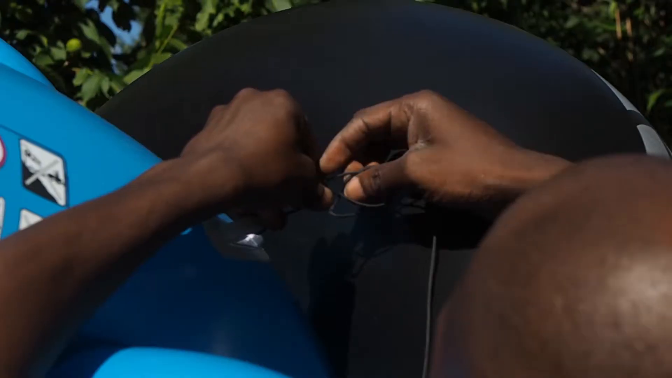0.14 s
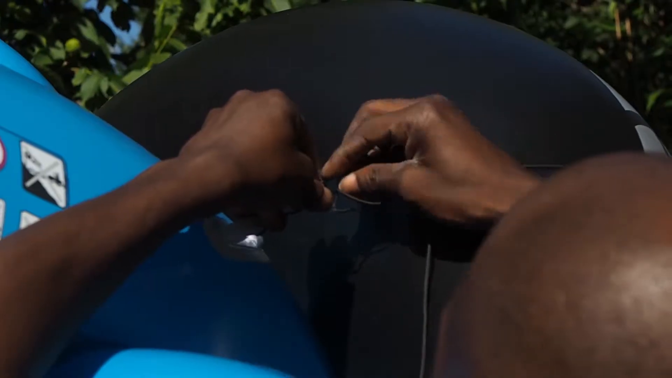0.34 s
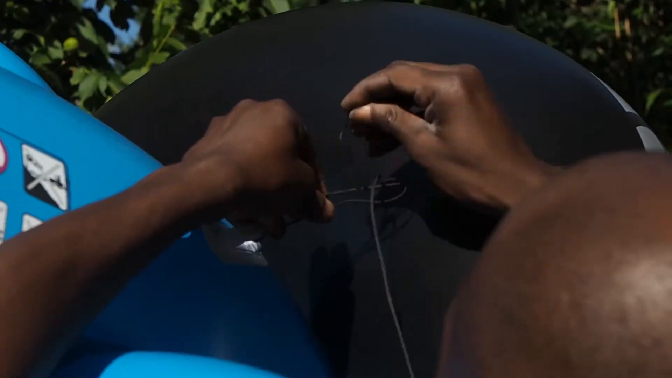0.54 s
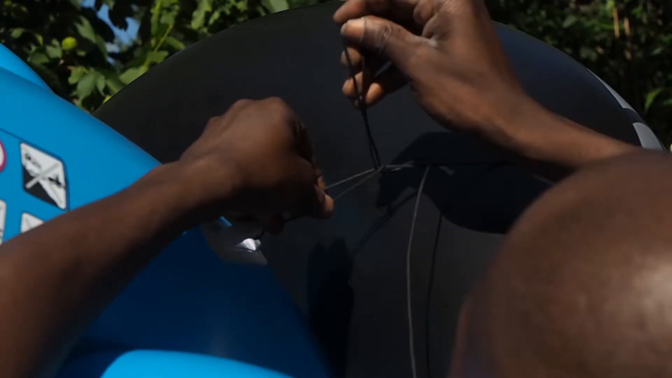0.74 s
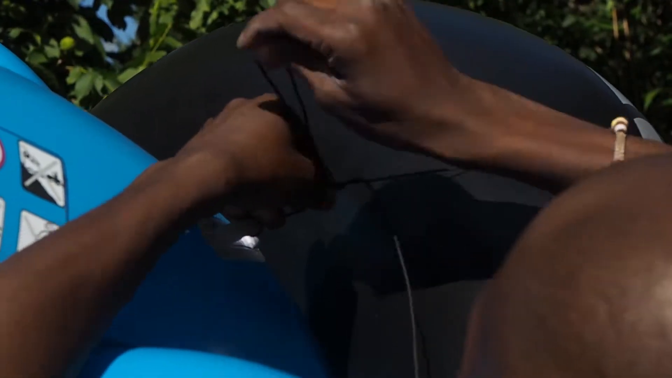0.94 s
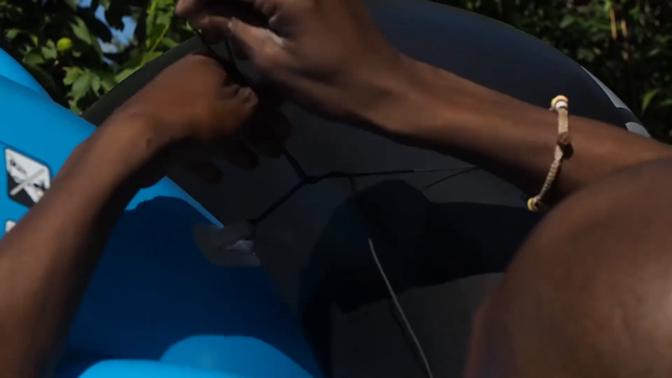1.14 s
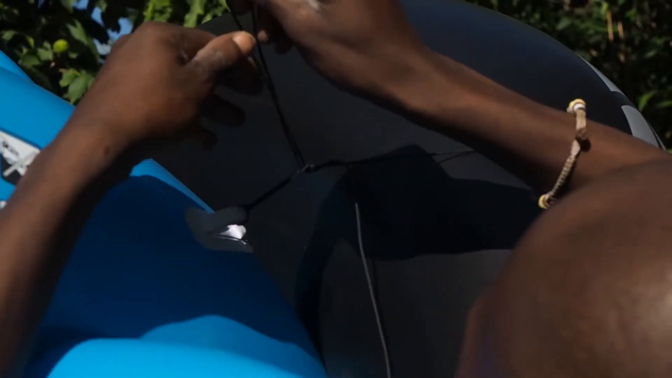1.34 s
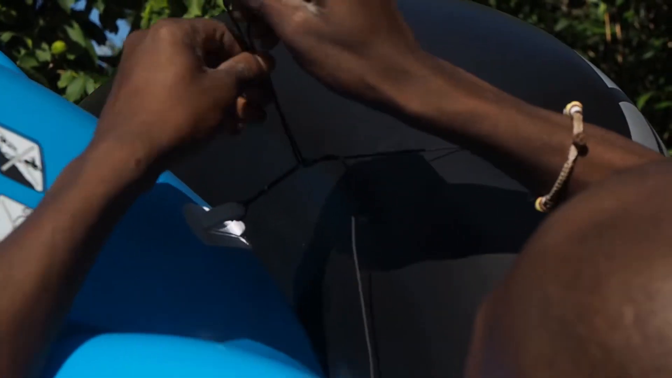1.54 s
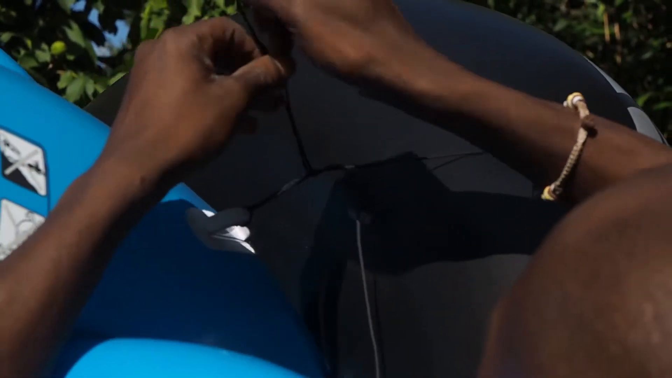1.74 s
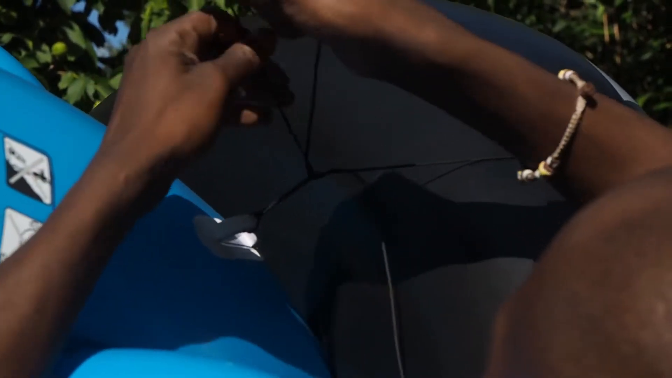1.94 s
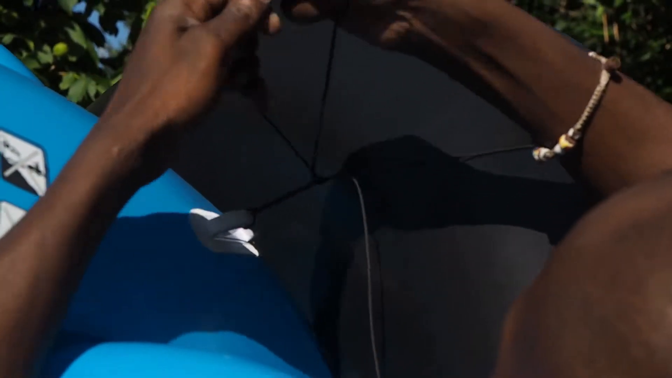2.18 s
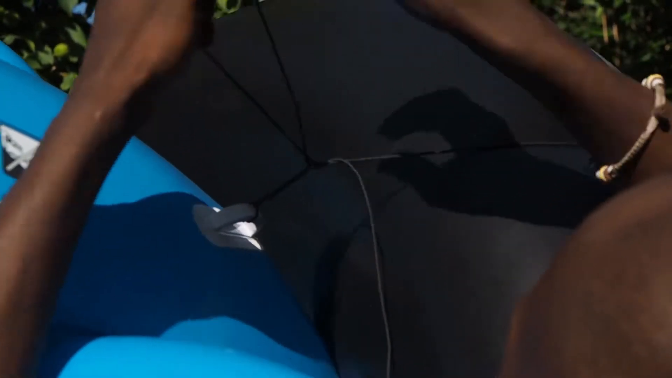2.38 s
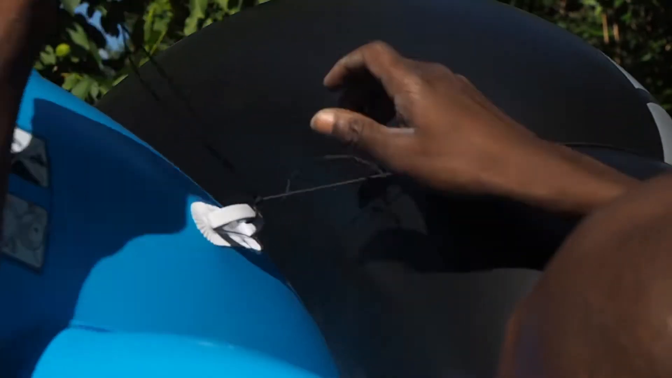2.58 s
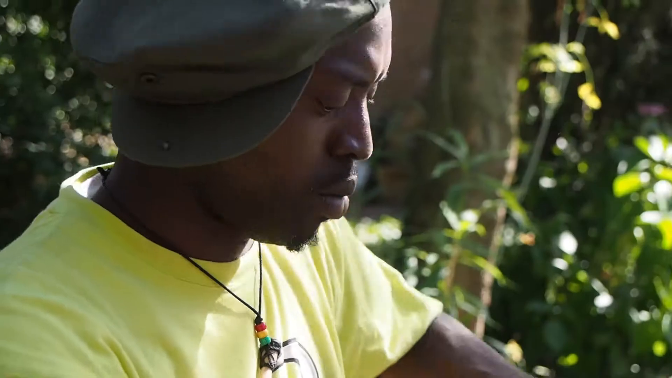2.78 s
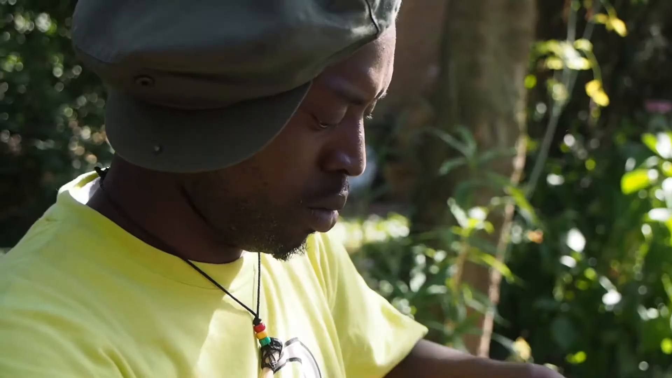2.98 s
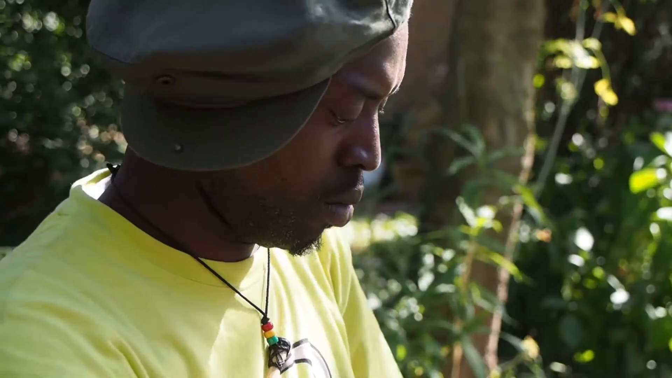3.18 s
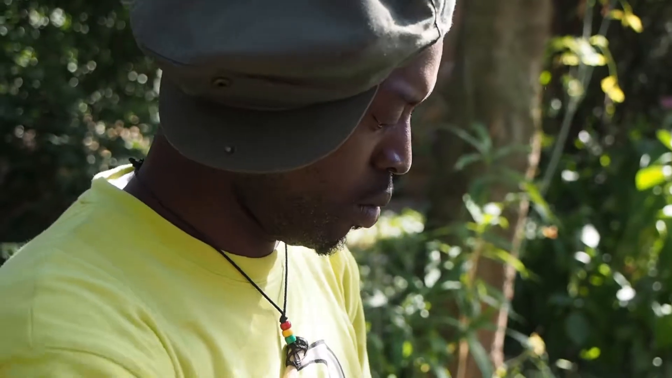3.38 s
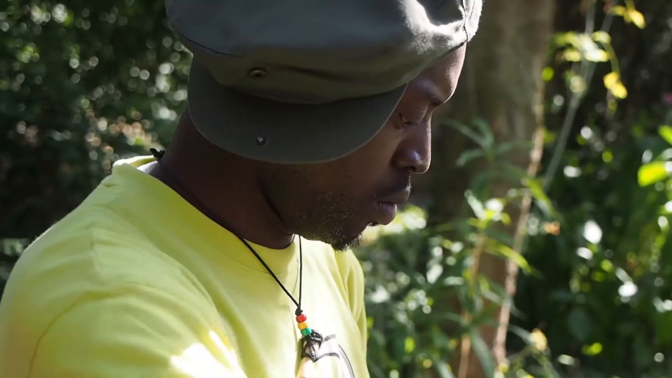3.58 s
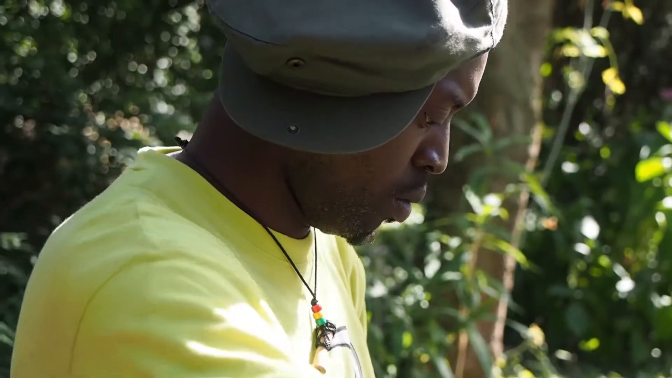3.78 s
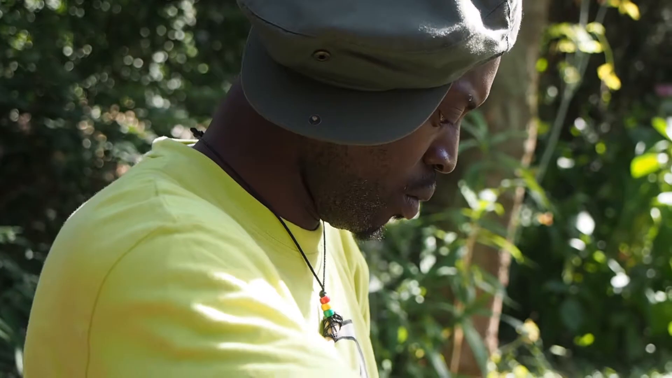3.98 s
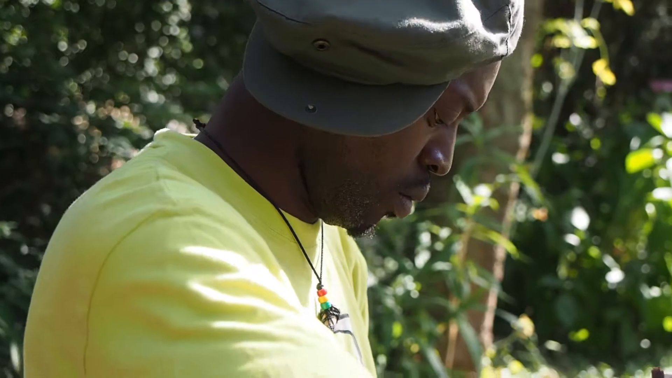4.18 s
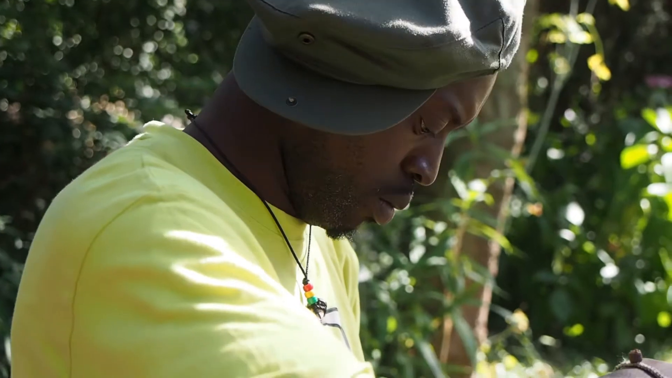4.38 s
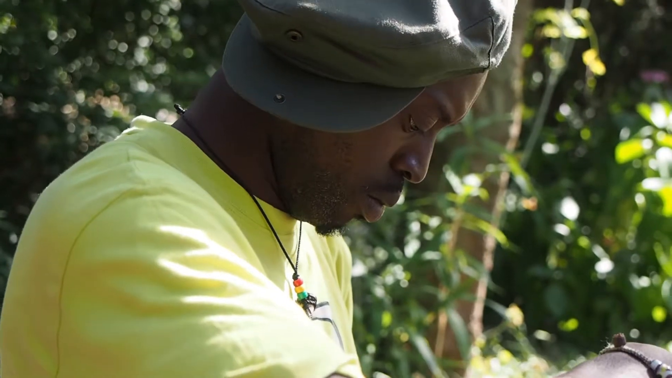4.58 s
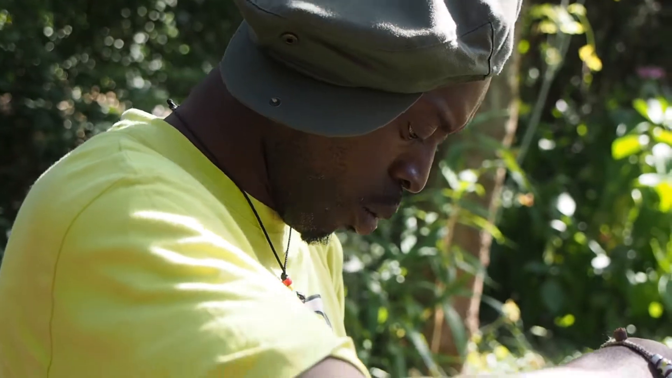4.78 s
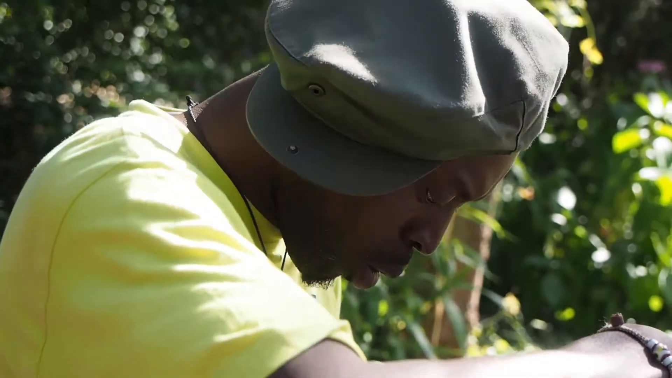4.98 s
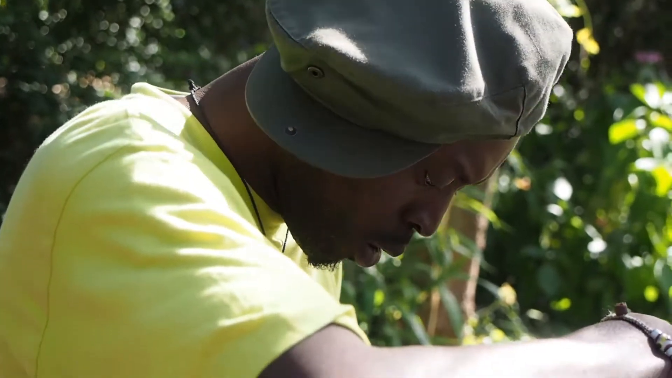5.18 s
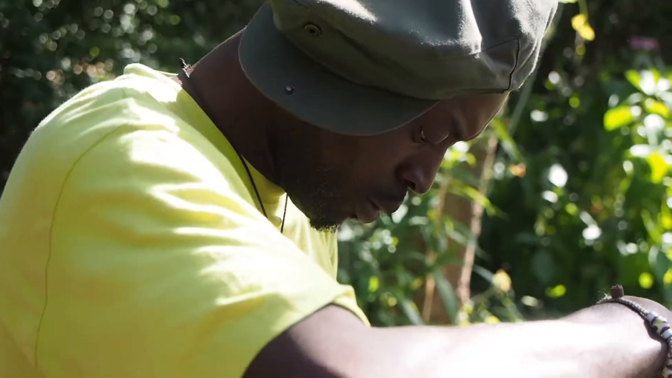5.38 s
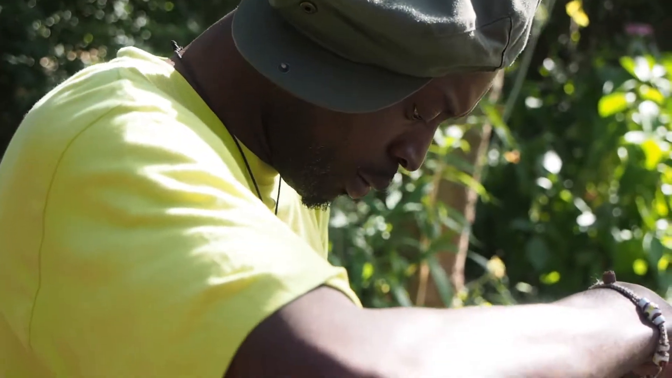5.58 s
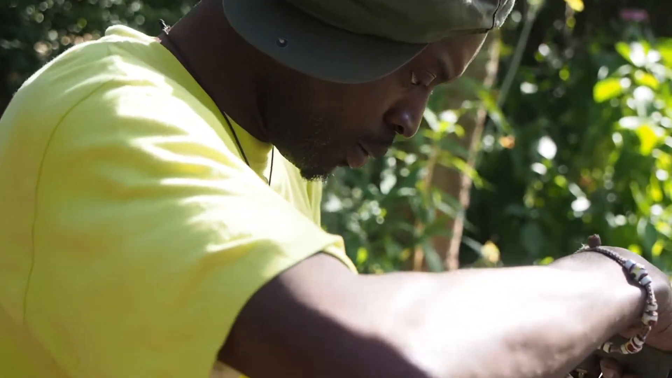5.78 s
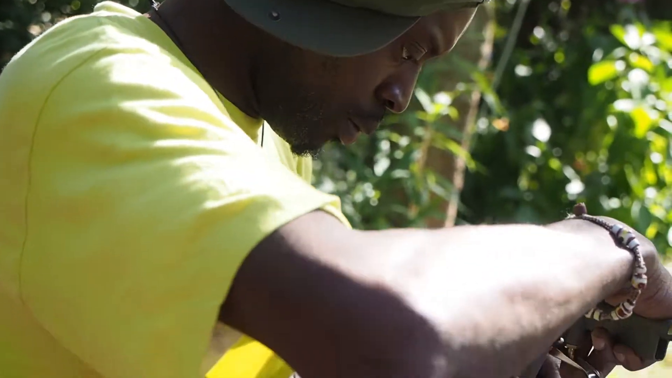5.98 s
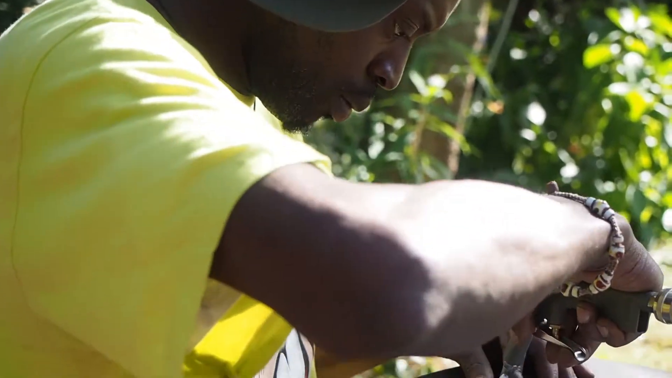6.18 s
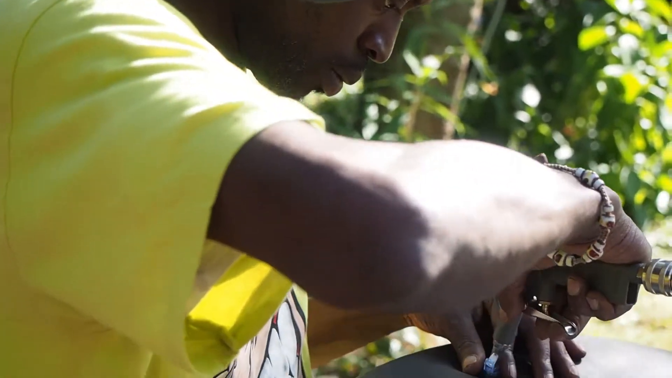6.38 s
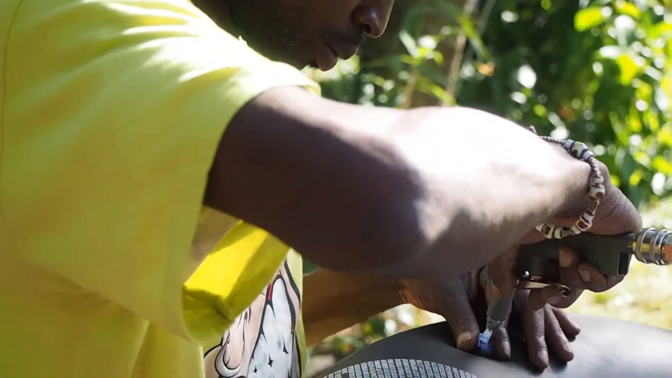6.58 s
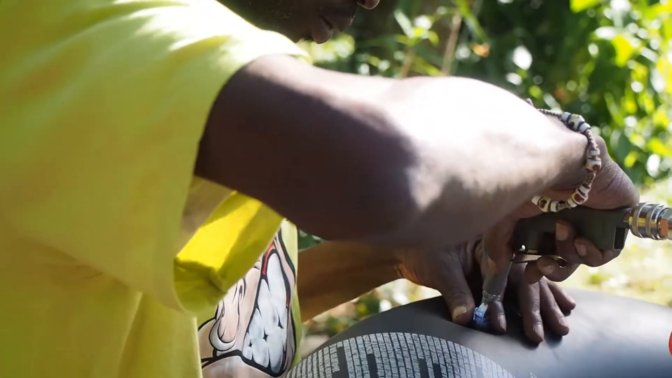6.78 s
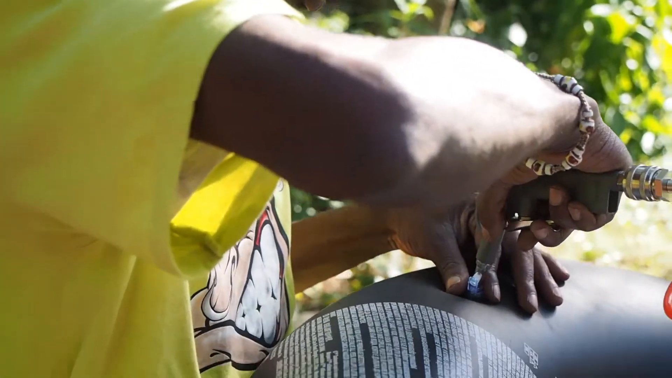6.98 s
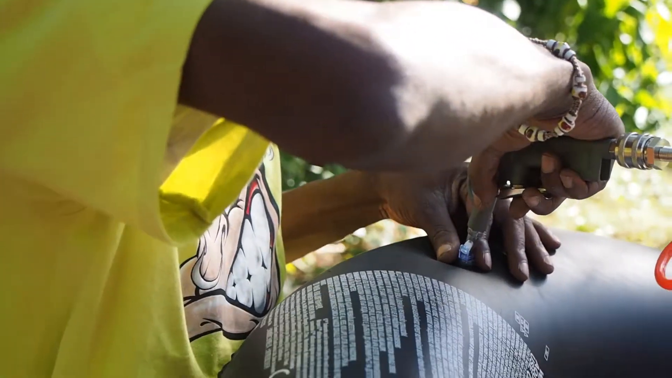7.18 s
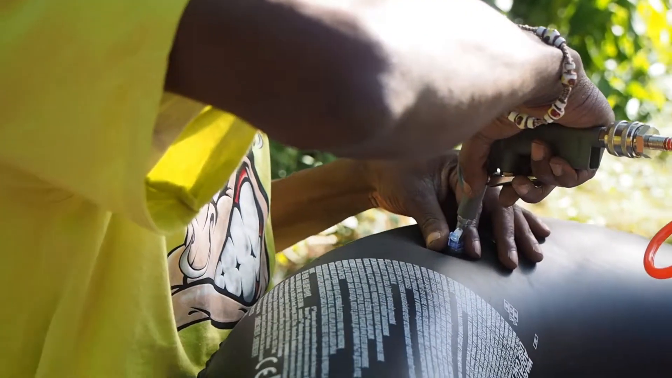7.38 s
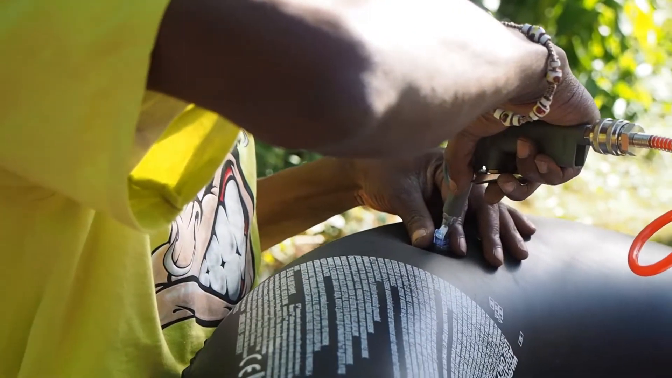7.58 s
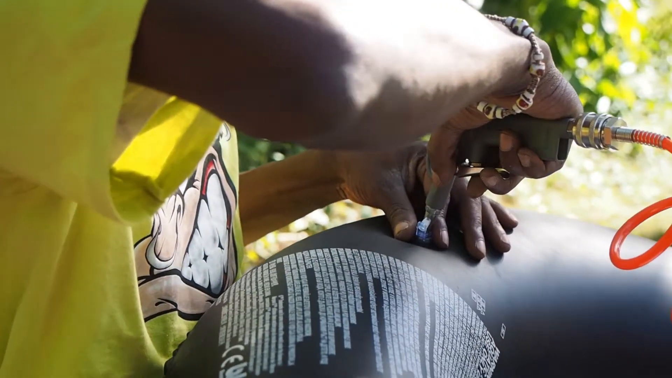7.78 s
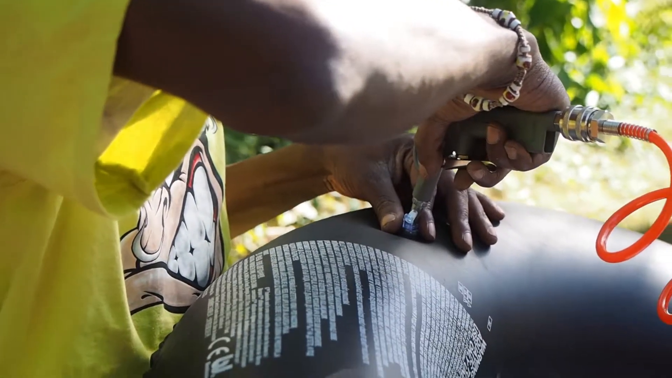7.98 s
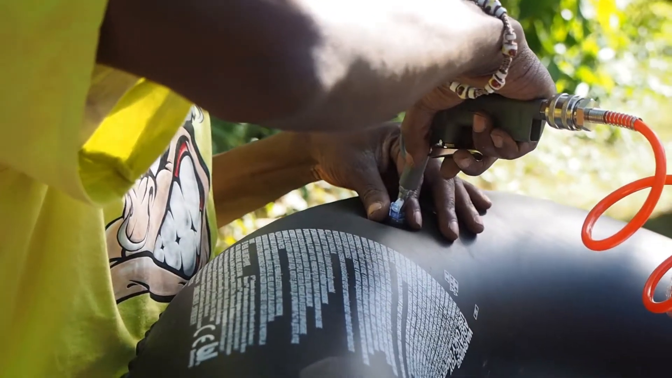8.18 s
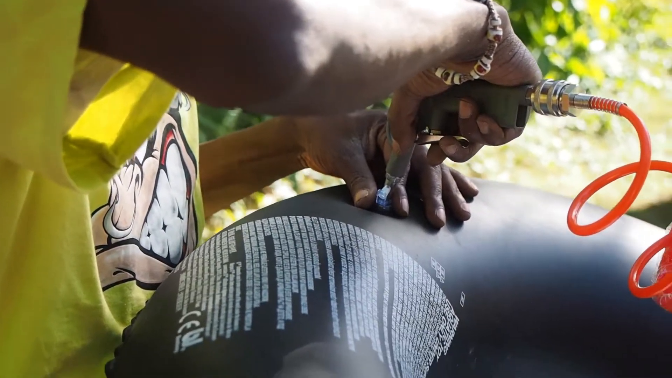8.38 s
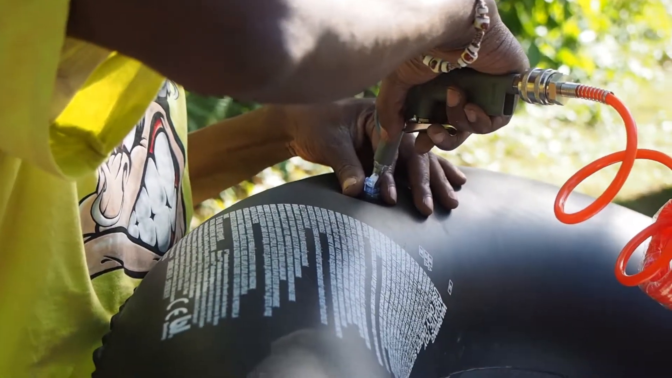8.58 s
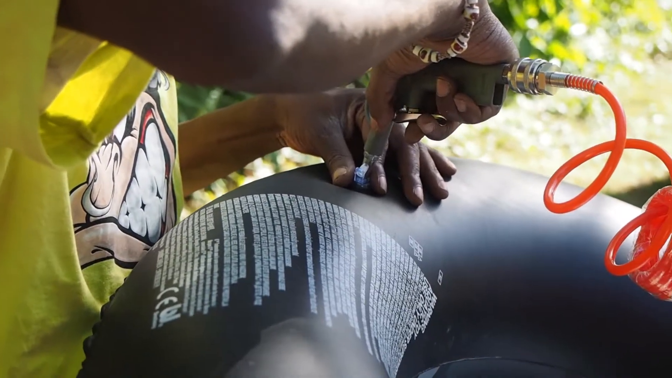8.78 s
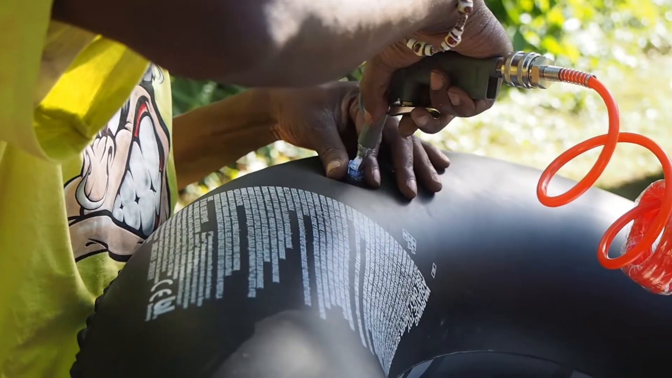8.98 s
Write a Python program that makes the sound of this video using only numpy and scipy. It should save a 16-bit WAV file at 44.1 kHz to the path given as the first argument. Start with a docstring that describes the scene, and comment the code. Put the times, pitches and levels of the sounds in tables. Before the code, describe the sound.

From the start, a piston air compressor runs outdoors close to the microphone: a steady buzzing hum, rapid metallic valve clatter and a rush of intake air. Between 0.5 and 2.6 seconds, hands make several short knocks on a taut rubber inner tube, the strongest near 1.8 seconds. At about 2.9 seconds a darker, boomier, more reflective sound of the compressor cuts in, while the closer one fades over four seconds. Faint bands of hiss swell and sink around 3.5 to 4.6 seconds, and a barely audible low drone enters near 4.5 seconds. At 6.5 seconds an air gun opens on the tube's valve with a sharp spit, then holds a loud, bright, turbulent hiss as the compressor drops well back. From 7.2 seconds two faint, high, fluttering whistles grow inside the jet, which continues until the end at about 9 seconds.

```python
"""A piston air compressor runs outdoors, close by: its strokes hum, its valve clatters, its intake and fan
rush, and hands bump a rubber tube. At 2.85 s a second, boomier listening place cuts in while the first fades
away; faint bands of hiss swell and sink, and a distant low drone sets in. At 6.5 s an air gun opens on the
tube's valve: a loud turbulent jet hisses and all the other sounds drop back. From 7.2 s two fluttering whistles
grow in the jet."""
import sys
import numpy as np
from scipy import signal
from scipy.fft import irfft
from scipy.io import wavfile
from scipy.ndimage import uniform_filter1d

SR = 44100
rng = np.random.default_rng(int(sys.argv[2]) if len(sys.argv) > 2 else 0)


def output_pcm(signal):
    """Save a mono or channel-first signal as 16-bit PCM at the path in sys.argv[1].

    Samples are clipped to [-1, 1] before scaling.
    """
    pcm = np.clip(np.atleast_2d(signal).T, -1, 1) * 32767
    wavfile.write(sys.argv[1], SR, np.round(pcm).astype(np.int16))


N = 398223

TURNS_PER_S = 46.8
CUT_S, DUCK_S = 2.853, 6.47  # the second place cuts in; the other sounds drop back once the jet opens

# the casing's EQ on the air noise: centre_hz, width_hz, boost_db
CASING_EQ = [(1570, 520, 6), (2650, 130, 2.5), (1920, 100, 3.5), (4440, 290, 2), (5500, 360, 2.5),
             (7070, 1600, -5.5), (7320, 270, -12), (11600, 460, -22), (13500, 480, -1)]

def compressor(gains, lag, harmonics, air, hum_delay_turns, spread, jitter_s, wet, puff_db):
    """Piston hum, valve clatter with its reflections, and air noise that can puff with the stroke."""
    turns = TURNS_PER_S * np.arange(N) / SR - uniform_filter1d(automation(lag), 20000, mode="nearest")
    clatter = valve_clatter(turns, jitter_s)
    clatter = evened(clatter + wet * reflections(clatter, t60_s=.22))
    puffs = gain_of(puff_db * np.cos(2 * np.pi * (turns - .35)))
    rush = puffs * noise(air, CASING_EQ, patchy_db=.5, flicker_db=-.06)
    rush = evened(rush + .3 * reflections(rush, t60_s=.05))
    hum = piston_hum(turns, harmonics, hum_delay_turns, spread)
    hum_gain, valve_gain, air_gain = gains
    return hum_gain * hum + valve_gain * clatter + air_gain * rush


def piston_hum(turns, harmonics, delay_turns, spread):
    """One pressure pulse a turn, its overtones spread over the stroke; strokes vary a little in force."""
    multiple, level_db = np.transpose(harmonics)
    spectrum = np.zeros(1025, complex)
    spectrum[multiple.astype(int)] = gain_of(level_db) * np.exp(-1j * np.pi * spread * multiple ** 2)
    stroke = evened(irfft(spectrum))
    waver_db = .2 * np.interp(turns, np.arange(-1, 430), rng.standard_normal(431))
    position = (turns - delay_turns) % 1 * 2048
    return gain_of(waver_db) * np.interp(position, np.arange(2049), np.r_[stroke, stroke[0]])


# reed and linkage hits within one turn: start_turns, level_db, tilt_db_per_khz, reed_db
VALVE_SLAPS = [(0, -1.5, -.7, 0), (.066, -4, 2, -8), (.1, -9, -1.5, -14), (.14, -14, 0, -12),
               (.21, -14, 0, -11), (.285, -10, 1, -12), (.325, -13, 1, -15), (.36, -9, -1, -12),
               (.405, -11, 1, -16), (.445, -14, 0, -16), (.485, -10, -1, -14), (.61, -15, 0, -17),
               (.69, -17, 0, -18), (.81, -19, 0, -18)]
# the cylinder head's metallic ring: pitch_hz, width_hz, level_db
HEAD_MODES = [(7000, 400, -12), (7750, 330, -2), (8050, 330, -2), (8500, 350, -3), (8900, 330, -1),
              (9250, 300, 0.1), (9650, 350, -3), (10050, 330, -1), (10450, 350, -3), (10850, 350, -5),
              (11300, 400, -10), (7770, 70, -20), (8050, 70, -20), (8950, 70, -19), (9210, 70, -18),
              (9360, 70, -19), (10060, 70, -19)]

def valve_clatter(turns, jitter_s):
    """Each slap rings the reed and its own spot on the head, a touch early or late, harder or softer."""
    out, taps = np.zeros(N), np.arange(-8, 9)
    scatter = rng.standard_normal((len(VALVE_SLAPS), 424, 2))  # timing and force, turn by turn
    spots = rng.random((len(VALVE_SLAPS), len(HEAD_MODES)))
    reed = ring(hz=13700, width_hz=540, level_db=-6.5)
    for (start_turns, level_db, tilt, reed_db), draws, spot in zip(VALVE_SLAPS, scatter, spots):
        at = np.interp(np.arange(-1, 423) + start_turns, turns, np.arange(N), -50, -50)
        at += jitter_s * SR * draws[:, 0]
        index = np.round(at).astype(int)[:, None] + taps
        clicks = np.sinc(index - at[:, None]) * np.hanning(19)[1:-1] * gain_of(draws[:, 1:])
        inside = (index >= 0) & (index < N)
        strikes = np.bincount(index[inside], clicks[inside], N)
        head = sum(ring(hz, width_hz, mode_db + level_db + tilt * (hz / 1000 - 9), phase)
                   for (hz, width_hz, mode_db), phase in zip(HEAD_MODES, spot))
        out += signal.oaconvolve(strikes, head + gain_of(reed_db) * reed)[:N]
    return evened(out)


def ring(hz, width_hz, level_db, phase_turns=0):
    """A struck mode; the reed lands over a fraction of a millisecond."""
    t = np.arange(1200) / SR
    attack = 1 - np.exp(-(t / .0002) ** 2)
    decay = np.exp(-np.pi * width_hz * t)
    return gain_of(level_db) * attack * decay * np.sin(2 * np.pi * (hz * t + phase_turns))


# how late the valve slaps as the motor speed drifts: time_s, lag_turns
NEAR_DRIFT = [(0, .613), (2.86, .632), (4.2, .634), (5, .63), (6.5, .603)]
# tone of the piston hum: turn_rate_multiple, level_db
NEAR_HARMONICS = [(1, -24.5), (2, -13), (3, -21), (4, -3.5), (5, -16.5), (6, -9), (7, -7.5), (8, -3.5),
                  (9, -2.5), (10, -17), (11, -3.5), (12, 3), (13, -3), (14, -1), (15, -8), (16, 3.5),
                  (17, -20), (18, -5.5), (19, -4), (20, -1), (21, -4), (22, -12), (23, -7.5), (24, -4),
                  (25, -22), (26, -33), (27, -20.5), (28, -17), (29, -9), (30, -21.5), (31, -11), (32, -5),
                  (33, -12), (34, -8), (35, -6), (36, -7), (37, -8), (38, -5), (39, -19), (40, -14),
                  (41, -9.5), (42, -12), (43, -13), (44, -18), (45, -20), (46, -22), (47, -33), (48, -26),
                  (49, -31), (50, -12), (51, -23), (52, -10), (53, -6), (54, -19), (55, -9), (56, -5.5),
                  (57, -11), (58, -31), (59, -26), (60, -21), (61, -15), (62, -8), (63, -19)]
# colour of the intake and cooling fan: frequency_hz, level_db
NEAR_AIR_COLOUR = [(24, -40), (40, -38), (85, -14), (136, -16), (183, -10.5), (462, -7), (564, -4),
                   (1220, -7), (2590, -6.5), (3400, -10), (6350, -7.5), (9010, 0), (12200, -16.5),
                   (13800, -19), (15600, -29)]
# slow waver of the overall level: time_s, gain_db
NEAR_WAVER = [(0, 0.6), (1.2, 0.76), (2, .3), (2.86, -1.7)]

def near_compressor(silent_s=7.03):
    """Close and fairly dry; after the cut each layer fades out at its own pace."""
    fade = np.clip(1 - since(CUT_S) / (silent_s - CUT_S), 0, 1)
    gains = [gain_of(level_db + automation(NEAR_WAVER)) * fade ** steepness
             for level_db, steepness in [(-27.5, 2), (-21.5, .81), (-26.5, 1.03)]]  # hum, valve, air
    return compressor(gains, NEAR_DRIFT, NEAR_HARMONICS, NEAR_AIR_COLOUR,
                      hum_delay_turns=.7, spread=-.125, jitter_s=.000013, wet=.22, puff_db=1.5)


# the motor's drift at the second place: time_s, lag_turns
FAR_DRIFT = [(0, .15), (2.86, .15), (4.4, .13), (5.2, .14), (6, .178), (7, .255), (8, .29), (9.1, .308)]
# the darker piston hum there: turn_rate_multiple, level_db
FAR_HARMONICS = [(1, -35), (2, -18), (3, -26), (4, -12), (5, -21.5), (6, -29), (7, -19), (8, -12.5),
                 (9, -7.5), (10, -6.5), (11, -12), (12, 3), (13, -1), (14, -7), (15, -1), (16, -5.5),
                 (17, -17.5), (18, -34), (19, -14.5), (20, -22), (21, -14), (22, -20.5), (23, -11.5),
                 (24, -15), (25, -36), (26, -22), (27, -30), (28, -17.5), (29, -31), (30, -21), (31, -31),
                 (32, -29), (33, -19.5), (34, -26), (35, -36), (36, -38.5), (37, -42), (38, -31), (39, -27),
                 (40, -17), (41, -18.5), (42, -28), (43, -13.5), (44, -13.5)]
# colour of the intake and fan there: frequency_hz, level_db
FAR_AIR_COLOUR = [(24, -44), (40, -44), (85, -33.5), (136, -23), (183, -15), (280, -24), (510, -5.5),
                  (564, -7), (706, -5.5), (841, -12.5), (1900, -13), (2020, -8), (2150, -12.5),
                  (5200, -19.5), (9010, -3.5), (15600, -28)]

def far_compressor(sag_db_per_s=-.07):
    """Boomier and wetter; it cuts in, sags a little and its level drops once the jet opens."""
    sag_db = sag_db_per_s * np.minimum(since(CUT_S), DUCK_S - CUT_S)
    gains = [fade_in(CUT_S, rise_s=.006) * gain_of(level_db + sag_db) * duck(depth_db)
             for level_db, depth_db in [(-22, -11.5), (-29.5, -10), (-27, -14)]]  # hum, valve, air
    return compressor(gains, FAR_DRIFT, FAR_HARMONICS, FAR_AIR_COLOUR,
                      hum_delay_turns=.011, spread=.1, jitter_s=.00003, wet=1., puff_db=0.)


# colour of the jet's bright hiss: frequency_hz, level_db
JET_COLOUR = [(180, -71), (300, -34), (411, -42), (518, -41), (544, -23), (721, -22), (836, -31.5),
              (1590, -15), (1820, -18.5), (3190, -11), (6830, -9), (8610, 2), (10500, -10), (13200, -14),
              (15600, -16.5)]
# resonant peaks and notches in the hiss: centre_hz, width_hz, boost_db
JET_EQ = [(2800, 83, -3.5), (3120, 540, 3), (3400, 130, -2), (3590, 200, 2.5), (3700, 100, -1.5),
          (4070, 110, -3), (4920, 150, 3), (5580, 170, 3.5), (5960, 81, 8.5), (6500, 150, 5),
          (7400, 490, 3.5), (8300, 320, 0), (9400, 89, 0.5), (13200, 1200, 7)]
# brief dips in the jet's level: centre_s, width_s, gain_db
JET_LEVEL_DIPS = [(6.97, 0.17, -1.5), (8.14, 0.16, -1.5), (8.5, 0.064, -1.1), (9.03, 0.27, -.9)]

def air_jet(open_s=6.465, level_db=-12.6, spit_s=.035, sway_hz=.2534, wet=.33):
    """Turbulent air escapes at the valve; reflections off tube and arms comb it, shifting as hands move."""
    t, age = np.arange(N) / SR, since(open_s)
    overshoot_db = 3.5 * np.exp(-age / .06)  # the first burst of pressure
    dips_db = sum(db * np.exp(-((t - s) / width_s) ** 2) for s, width_s, db in JET_LEVEL_DIPS)
    envelope = fade_in(open_s, rise_s=.024) ** 2 * gain_of(level_db + overshoot_db + dips_db)
    hiss = noise(JET_COLOUR, JET_EQ, patchy_db=.9, flicker_db=.4)
    # the lower hiss spits, then dips and returns as the seal settles
    lower_db = np.where(age < spit_s, 3.5, -.5 * np.exp(-(age - spit_s) / .25))
    lower_gain = gain_of(uniform_filter1d(lower_db, 400))
    hiss = envelope * (hiss + (lower_gain - 1) * filtered(hiss, "lowpass", 5500, order=3))
    sway = 2 * np.pi * sway_hz * t
    echoes = np.cos(sway) * reflections(hiss, t60_s=.072) + np.sin(sway) * reflections(hiss, t60_s=.092)
    return (hiss + wet * np.std(hiss) * evened(echoes)) / np.sqrt(1 + wet ** 2)


# short rubbery knocks of hands on the tube: start_s, level_db, pitch_hz, t60_s
TUBE_BUMPS = [(0.554, -11.5, 330, 0.01), (.884, -13, 770, 0.022), (.895, -12, 844, .02),
              (0.969, -15.5, 390, 0.03), (.987, -19, 560, .03), (1.201, -24, 420, .012),
              (1.824, -3.5, 376, 0.01), (2.219, -10, 298, 0.016), (2.357, -14, 500, .012),
              (2.588, -16, 400, 0.018), (2.62, -23, 500, 0.022)]

def tube_bumps():
    """A push on the taut rubber and its short rebound; the tube radiates little deep bass."""
    out, t = np.zeros(N), np.arange(3000) / SR
    for start_s, level_db, pitch_hz, t60_s in TUBE_BUMPS:
        envelope = np.minimum(4 * pitch_hz * t, 1) * gain_of(level_db - 60 * t / t60_s)
        out[round(start_s * SR):][:len(t)] += envelope * np.sin(2 * np.pi * pitch_hz * t)
    return filtered(out, "highpass", 110, order=1)


# two narrow whistling peaks: frequency_hz, level_db
WHISTLE_COLOUR = [(2800, -38), (3080, -7), (3200, 4), (3320, -12), (3480, -19), (3580, 3), (3660, -16),
                  (4000, -40)]

def nozzle_whistles(level_db=-32.5):
    """Two narrow bands of hiss fade in and flutter at the nozzle."""
    return gain_of(level_db) * fade_in(start_s=7.2, rise_s=.27) * noise(WHISTLE_COLOUR, patchy_db=2.5)


# the swelling hiss's broad body, airy top and narrow middle band: frequency_hz, level_db
BODY_COLOUR = [(1200, -40), (2500, -1.5), (4000, 0.5), (5400, -3.5), (6000, 1), (6600, -15), (9000, -40)]
TOP_COLOUR = [(9000, -40), (11500, -10), (13000, 7), (15500, 0), (16500, -14)]
MID_COLOUR = [(5000, -40), (5700, -4), (6000, 0.1), (6300, -4), (7000, -40)]

def hiss_swells():
    """Faint, patchy bands of hiss come and go at the second listening place."""
    body = swell(4.6, -34, rise_db_per_s=5, fall_db_per_s=32) * noise(BODY_COLOUR, patchy_db=1.5)
    top = swell(3.55, -35.5, rise_db_per_s=30, fall_db_per_s=4) * noise(TOP_COLOUR, patchy_db=.3)
    mid = swell(3.5, -38, rise_db_per_s=40, fall_db_per_s=50) * noise(MID_COLOUR, patchy_db=.8)
    return (since(CUT_S) > 0) * (body + top + mid)


def distant_drone(peak_s=5.6, pitch_hz=62, climb_hz_per_s=7):
    """A narrow band of low noise on a slowly rising pitch; it ducks under the jet."""
    hz = pitch_hz + climb_hz_per_s * np.clip(np.arange(N) / SR - peak_s, -2, 1)
    phase = 2 * np.pi * np.cumsum(hz) / SR
    wander = filtered(rng.standard_normal((N, 2)).T, "lowpass", 7, order=2)
    rumble = evened(wander[0] * np.cos(phase) + wander[1] * np.sin(phase))
    envelope = fade_in(start_s=4.45, rise_s=.15) * swell(peak_s, -53.5, rise_db_per_s=3, fall_db_per_s=5)
    return envelope * duck(depth_db=-12) * rumble


def reflections(x, t60_s):
    """Sparse echoes of random sign off nearby surfaces, at rms 1."""
    taps = np.zeros(6000)
    at = np.arange(60, 5980, 20) + rng.integers(0, 20, 296)
    taps[at] = rng.choice([-1., 1.], 296) * gain_of(-60 * at / SR / t60_s)
    return evened(signal.oaconvolve(x, taps)[:N])


def noise(colour, eq=(), patchy_db=1., flicker_db=-.1):
    """Coloured noise at rms 1, with EQ bells, drifting patches and a flicker shared by all bands."""
    frames, hz = N // 256 + 5, np.fft.rfftfreq(1024, 1 / SR)
    real, imaginary, patches = rng.standard_normal((frames, 513, 3)).T
    patches = evened(uniform_filter1d(uniform_filter1d(patches, 12, axis=0), 14, axis=1))
    flicker = evened(uniform_filter1d(rng.standard_normal(frames), 5))
    point_hz, point_db = np.transpose(colour)
    colour_db = np.interp(np.log(hz + 1), np.log(point_hz + 1), point_db)
    for centre_hz, width_hz, boost_db in eq:
        colour_db += boost_db / (1 + (2 * (hz - centre_hz) / width_hz) ** 2)
    gain = gain_of(colour_db[:, None] + patchy_db * patches + flicker_db * flicker)
    return evened(signal.istft((real + 1j * imaginary) * gain, nperseg=1024, noverlap=768)[1][:N])


def swell(peak_s, peak_db, rise_db_per_s, fall_db_per_s):
    """A gain that climbs to its peak and sinks again at steady rates."""
    t = np.arange(N) / SR - peak_s
    return gain_of(peak_db + np.minimum(rise_db_per_s * t, -fall_db_per_s * t))


def duck(depth_db, tau_s=.039):
    """Gain of what drops back once the jet is open."""
    return gain_of(depth_db * (1 - np.exp(-since(DUCK_S) / tau_s)))


def fade_in(start_s, rise_s):
    """A straight ramp from 0 to 1."""
    return np.minimum(since(start_s) / rise_s, 1)


def since(start_s):
    """Seconds elapsed after a moment, zero before it."""
    return np.maximum(np.arange(N) / SR - start_s, 0)


def automation(points):
    """Straight lines through (time_s, value) points."""
    return np.interp(np.arange(N) / SR, *np.transpose(points))


def filtered(x, kind, hz, order):
    """A Butterworth filter."""
    return signal.sosfilt(signal.butter(order, hz, kind, fs=SR, output="sos"), x)


def gain_of(db):
    """Decibels to a factor."""
    return 10 ** (np.asarray(db) / 20)


def evened(x):
    """Scales to rms 1."""
    return x / np.sqrt(np.mean(x ** 2) + 1e-20)


def scene():
    """A mono mix, copied left and right."""
    mix = near_compressor() + far_compressor() + air_jet()
    mix += hiss_swells() + tube_bumps() + distant_drone() + nozzle_whistles()
    return np.tile(mix, (2, 1))


def record(dry, top_hz=15775):
    """The microphone loses the deepest bass; a steep low-pass trims the highest treble."""
    thinned = filtered(dry, "highpass", 35, order=2)
    lowpass = signal.firwin(2047, top_hz, window=("kaiser", 9), fs=SR)
    return signal.oaconvolve(thinned, lowpass[None], "same")


dry = scene()
out = record(dry)
output_pcm(out)
```